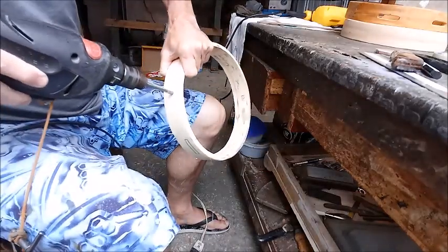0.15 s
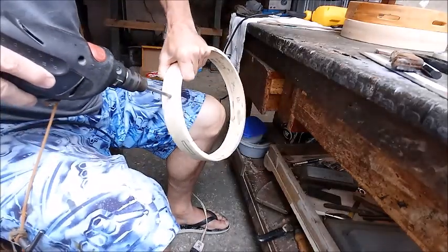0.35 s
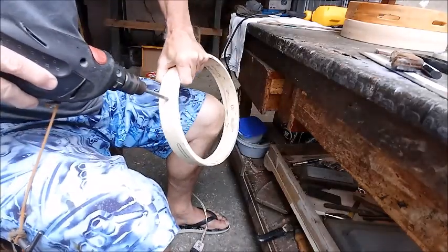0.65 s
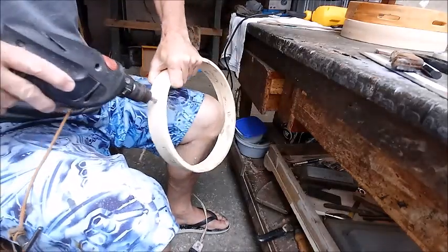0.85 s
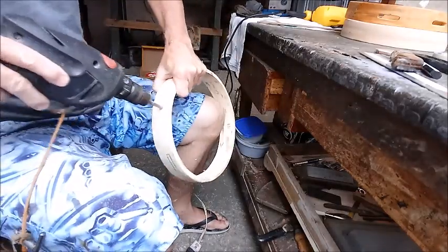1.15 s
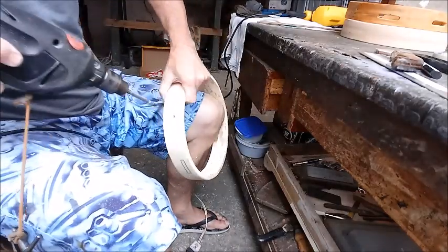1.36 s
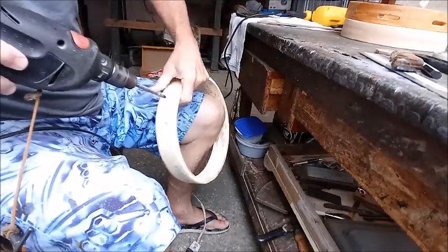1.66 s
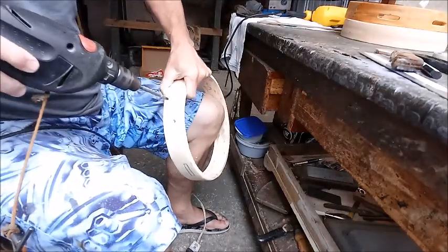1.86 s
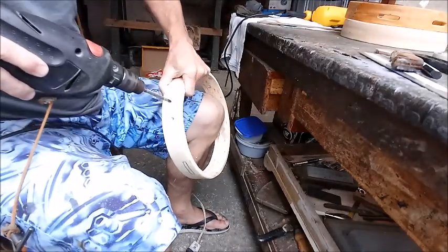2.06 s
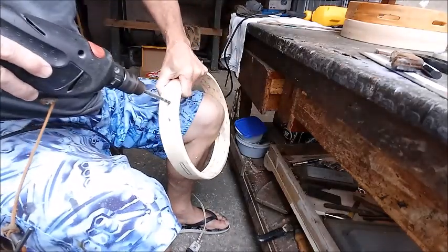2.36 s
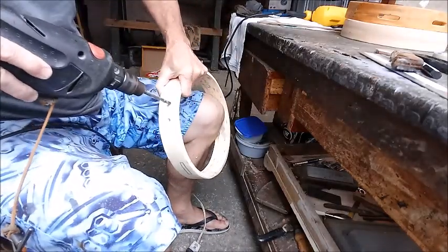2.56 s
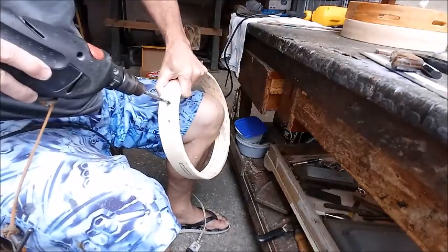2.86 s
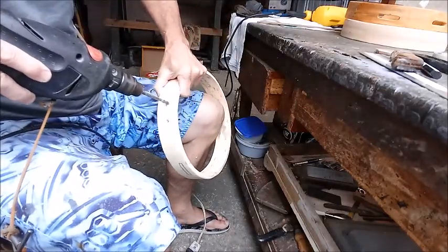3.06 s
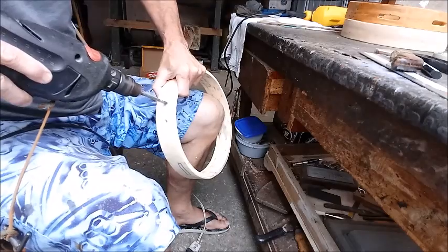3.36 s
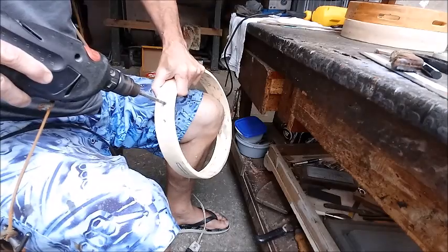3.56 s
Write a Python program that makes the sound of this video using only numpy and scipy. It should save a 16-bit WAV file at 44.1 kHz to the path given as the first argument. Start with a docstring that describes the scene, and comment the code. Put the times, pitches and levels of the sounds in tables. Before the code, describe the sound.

Close up in a small room, an electric drill cuts through a wooden hoop with a whine and an airy hiss. It briefly speeds up once free, winds down to a ticking rattle, and revs back to full speed.

```python
"""A corded drill bores through a thin wooden hoop, close by in a small workshop.
The motor whines over a rush of brushes and fan air, and its pitch sags as the bit bites.
The bit comes free and the rotor picks up, then coasts down with chattering gears until
single knocks ring the casing. Last, the motor spins up again.
Every tone is a multiple of the rotor speed, so all of them glide together."""
import sys
import numpy as np
from scipy import signal
from scipy.fft import rfft, irfft
from scipy.io import wavfile

SR = 44100
rng = np.random.default_rng(int(sys.argv[2]) if len(sys.argv) > 2 else 0)


def to_wav(sig):
    """Store sig (one row per channel, or 1-D mono) as 16-bit WAV at the path in sys.argv[1].

    Samples outside -1..1 are clipped; the rate is SR.
    """
    pcm = np.clip(np.atleast_2d(sig), -1, 1) * 32767
    pcm = np.round(pcm).astype(np.int16)
    wavfile.write(sys.argv[1], SR, pcm.T)  # frames by channels


N = 163170
FULL_SPEED_HZ = 356.3
PORT_NULL_HZ = 2835   # the microphone's two ports cancel at odd multiples of this

# effort of the motor: time_s, whine_db, load_fraction
EFFORT = [(0, -2.5, 0.4), (.3, -0.5, 0.05), (.62, -1, 0.27), (.9, 0.5, 0.63), (1.04, 2, 0.97), (1.17, 6, 1),
          (1.27, 1, 0.97), (1.45, -20.5, 0), (3.15, -12, 0), (3.4, 3, 0), (3.7, -2, 0)]


def from_db(db):
    """Amplitude grows tenfold with every 20 dB."""
    return 10 ** (np.asarray(db) / 20)


def rms_one(x):
    """Normalisation to unit mean power."""
    return x / np.sqrt(np.mean(x ** 2) + 1e-20)


def in_time(rows):
    """Linear interpolation of each column against the first, time."""
    time_s, *columns = np.transpose(rows)
    return [np.interp(np.arange(N) / SR, time_s, column) for column in columns]


def drift(corner_hz):
    """Low-passed noise: a random fluctuation with unit spread."""
    step = 40   # samples between points
    pole = np.exp(-2 * np.pi * corner_hz * step / SR)
    noise = rng.standard_normal(N // step + 2002)
    slow = signal.lfilter([1], [1, -2 * pole, pole * pole], noise)[2000:]
    return np.interp(np.arange(N) / step, np.arange(len(slow)), rms_one(slow))


def coloured(x, spectrum):
    """Spectral shaping, scaled so that white noise keeps its power after the ports."""
    hz = np.arange(N + 1) * SR / (2 * N)
    points_hz, points_db = np.transpose(spectrum)
    gain = from_db(np.interp(np.log(hz + 1), np.log(points_hz), points_db))
    pickup = np.cos(np.pi * hz / (2 * PORT_NULL_HZ))
    gain /= np.sqrt(np.mean((gain * pickup) ** 2))
    return irfft(rfft(x, 2 * N) * gain)[:N]


def tone(turns, multiple, db):
    """Rotational order: a flickering sine, raised up to fivefold against port loss at full speed."""
    pickup = max(abs(np.cos(np.pi * multiple * FULL_SPEED_HZ / (2 * PORT_NULL_HZ))), .2)
    flicker_db = 2 * drift(corner_hz=9.3)
    amplitude = np.sqrt(2) / pickup * from_db(db + flicker_db)
    return amplitude * np.sin(2 * np.pi * (multiple * turns + rng.random()))


def workshop(x):
    """Reverberation: diffuse reflections in the cluttered room decay exponentially."""
    level_db, t60_s, gap_s = -11.5, 0.21, .004
    t = np.arange(SR // 2) / SR
    tail = rng.standard_normal(len(t)) * from_db(-60 * t / t60_s) * (t > gap_s)
    return from_db(level_db) * signal.fftconvolve(x, tail / np.linalg.norm(tail))[:N]


def commutator_whistle(turns):
    """A high rotational order: the commutator's thin whistle."""
    # whistle strength: time_s, level_db
    whistle = [(1.0, -62), (1.35, -47), (1.85, -54), (2.15, -85)]
    return tone(turns, multiple=37.77, db=in_time(whistle)[0])


def shaft_hum(speed, turns, free, shaft_db):
    """Forced vibration: gear shafts and rotor unbalance hum, growing as a power of speed."""
    # gear shaft tones: rotor_multiple, in_wood_db, free_db
    shaft_tones = [(.428, -60, -50), (.685, -50.5, -48), (.856, -39.5, -53)]
    shafts = sum(tone(turns, k, shaft_db + held + free * (idle - held)) for k, held, idle in shaft_tones)
    unbalance = tone(turns, multiple=1, db=-41 + 3 * free)
    return (shafts + unbalance) * (speed / FULL_SPEED_HZ) ** 2.84


def fan_rasp(speed, turns, free):
    """Random modulation spreads the fan tone into a rough band once the bit is free."""
    whine_db, _ = in_time(EFFORT)
    carrier = tone(turns, multiple=6, db=whine_db - 27.5)
    return free * (speed / FULL_SPEED_HZ) ** 2 * drift(corner_hz=190) * carrier


def gear_mesh(speed, turns, mesh_db):
    """Periodic tooth contact makes tones whose amplitude grows with speed squared."""
    # mesh tones: rotor_multiple, level_db
    mesh_tones = [(1.711, -33), (3.422, -29.5), (9.41, -40)]
    return sum(tone(turns, k, db + mesh_db) for k, db in mesh_tones) * (speed / FULL_SPEED_HZ) ** 2


def casing(slowness, turns):
    """Modal resonance: at low speed, ticks and knocks of the slack gears ring the casing."""
    # knocks of the gears: start_s, peak_db
    knock_list = [(2.7223, -11), (2.803, -20.5), (2.816, -20), (2.8353, -16), (2.850, -19), (2.872, -17),
                  (2.883, -15), (2.902, -28), (2.911, -14), (2.922, -12.5), (2.933, -15), (2.945, -14),
                  (2.972, -15), (2.982, -13), (2.9941, -13.5), (3.043, -14.5), (3.049, -11), (3.074, -10.5),
                  (3.093, -14), (3.123, -10.5), (3.153, -8), (3.188, -7.5), (3.218, -11)]
    # casing modes: pitch_hz, width_hz, level_db
    modes = [(857, 140, 6), (1978, 344, 8), (2512, 520, 6.5), (3590, 420, 6.5), (5140, 360, -3),
             (6050, 210, 2.5)]
    knock_decay_s, tick_db, tick_decay_per_turn, band_hz = 0.0018, -20.5, 4.04, (560, 10200)
    hits = np.zeros(N)
    for start_s, peak_db in knock_list:
        hits[int(start_s * SR)] = from_db(peak_db)
    knocks = signal.lfilter([1], [1, -np.exp(-1 / (knock_decay_s * SR))], hits + 1e-18)
    ticks = from_db(tick_db) * slowness * np.exp(-tick_decay_per_turn * (turns % 1))
    drive = np.hypot(knocks, ticks) * rng.choice([-1, 1], N)
    rings = np.zeros(N)
    for k, (hz, width, db) in enumerate(modes):
        resonator = signal.iirpeak(hz, hz / width, fs=SR)
        rings += (-1) ** k * from_db(db) * signal.lfilter(*resonator, drive)
    total_width = sum(width for _, width, _ in modes)
    band = signal.butter(2, band_hz, "band", fs=SR, output="sos")
    return np.sqrt(SR / (np.pi * total_width)) * signal.sosfilt(band, rings)


def gear_chatter(speed):
    """Shot noise: random tooth impacts ring the gearbox, fewer as the rotor slows."""
    # chatter strength: time_s, level_db
    chatter = [(0, -24), (.65, -23), (1.0, -26), (1.2, -24), (1.32, -20), (1.55, -19), (1.8, -20.5),
               (2.15, -22.5), (2.5, -26), (2.8, -29.5), (3.08, -31), (3.15, -23.5), (3.3, -23), (3.45, -21),
               (3.7, -22.5)]
    # gearbox spectrum: frequency_hz, level_db
    gearbox = [(25, -33), (90, -29.5), (200, -18), (320, -10), (520, -3), (750, 0.5), (1000, 2.5),
               (1280, 0.5), (1550, -9.5), (2000, -10.5), (3000, -9), (8000, -57)]
    impacts_per_s, spread_db = 2600 * speed / FULL_SPEED_HZ, 2.5
    hit = rng.random(N) < impacts_per_s / SR
    sizes = from_db(spread_db * rng.standard_normal(N)) * rng.choice([-1, 1], N)
    impacts = rms_one(hit * sizes / np.sqrt(speed))   # even power at any impact rate
    return from_db(in_time(chatter)[0]) * coloured(impacts, gearbox)


def brushes(slowness, turns):
    """Amplitude modulation: brush and air noise swells once a turn and pulses with the mains."""
    # strength of the rush: time_s, level_db
    rush = [(0, -18), (.4, -17.5), (.8, -17), (1.2, -21.5), (1.32, -17), (1.5, -20), (1.8, -21),
            (2.2, -23.5), (2.55, -25.5), (2.85, -30.5), (3.06, -29), (3.2, -22.5), (3.28, -19), (3.48, -18),
            (3.7, -17)]
    # spectrum of brushes and fan air: frequency_hz, level_db
    air = [(100, -45), (800, -16), (1500, -6), (1950, 0.5), (2450, -0.5), (3200, 1.5), (3700, 3),
           (4400, 0.5), (5100, 0), (5900, 0.5), (6400, -2), (7000, -8.5), (8000, -21), (9000, -26.5),
           (10500, -21.5), (12000, -22), (13500, -24.5), (14700, -9.5), (15700, -14.5)]
    turn_spread_db, mains_pulse_hz = 1.5, 101.6
    depth = 0.14 + 0.31 * slowness
    turn_gain = from_db(turn_spread_db * rng.standard_normal(N)[turns.astype(int)])
    swell = np.exp(depth * np.cos(2 * np.pi * turns)) / np.sqrt(np.i0(2 * depth))   # unit mean power
    mains = 1 + 0.09 * np.sin(2 * np.pi * mains_pulse_hz * np.arange(N) / SR)
    noise = rms_one(swell * turn_gain * mains * rng.standard_normal(N))
    return from_db(in_time(rush)[0]) * coloured(noise, air)


def motor_whine(speed, turns, free):
    """Harmonic series: fan and armature tones, whose balance shifts with the load on the bit."""
    # harmonics: rotor_multiple, light_touch_db, loaded_db, free_db
    harmonics = [(5, -29, -46.5, -45), (6, -23, -22, -30), (7, -35, -41.5, -41), (11, -42, -33, -38),
                 (12, -25, -20.5, -29), (13, -30, -29, -40), (16, -31, -37, -48), (17, -25.5, -29, -35),
                 (18, -22.5, -32, -27.5)]
    whine_db, load = in_time(EFFORT)
    whine = np.zeros(N)
    for multiple, light_db, loaded_db, free_db in harmonics:
        in_wood_db = light_db + load * (loaded_db - light_db)
        whine += tone(turns, multiple, whine_db + (1 - free) * in_wood_db + free * free_db)
    return whine * (speed / FULL_SPEED_HZ) ** 2


def drive_train(speed, turns, free):
    """Phase modulation: the rotor's unsteadiness shakes motor and gear tones together."""
    # firmness of the gears: time_s, mesh_db, shaft_db
    firmness = [(0, -3.5, 0.5), (.33, -2.5, 2), (.52, 4, -21), (.85, -2.5, -17), (1.05, -13.5, -12.5),
                (3.2, -17.5, -6.5), (3.55, -11, -1.5)]
    mesh_db, shaft_db = in_time(firmness)
    wander_rad = 0.027 * drift(corner_hz=26)
    shudder_rad = 0.12 * free * drift(corner_hz=54)   # nothing steadies the free spindle
    shaky = turns + (wander_rad + shudder_rad) / (2 * np.pi)
    return (motor_whine(speed, shaky, free) + gear_mesh(speed, shaky, mesh_db)
            + shaft_hum(speed, shaky, free, shaft_db) + commutator_whistle(shaky))


def scene():
    """Superposition: one rotor drives every layer, heard in the centre."""
    # rotor speed: time_s, rotation_hz
    rotor_speed = [(0, 354.4), (.32, 356.8), (.6, 353.5), (.88, 339.5), (.95, 332.3), (1.02, 329),
                   (1.13, 321.8), (1.22, 323), (1.34, 356.4), (1.47, 373.4), (1.72, 323.6), (2.0, 267.9),
                   (2.4, 200.7), (2.65, 162.8), (2.82, 109.3), (2.97, 87.8), (3.08, 167.6), (3.27, 279.6),
                   (3.4, 326.6), (3.55, 356.2), (3.7, 375)]
    speed, = in_time(rotor_speed)
    turns = np.cumsum(speed) / SR
    slowness = np.clip(1 - speed / FULL_SPEED_HZ, 0, 1)
    withdraw_s, clear_s = 1.187, 1.33   # the bit leaves the wood
    free, = in_time([(withdraw_s, 0), (clear_s, 1)])
    clatter = gear_chatter(speed) + brushes(slowness, turns) + casing(slowness, turns)
    tones = drive_train(speed, turns, free) + fan_rasp(speed, turns, free)
    return np.tile(tones + clatter + workshop(clatter), (2, 1))


def record(dry):
    """Comb filtering: the microphone sums two ports, one delayed; a steep low-pass cuts the top."""
    cutoff_hz = 15850
    hz = np.arange(N + 1) * SR / (2 * N)
    comb = (1 + np.exp(-1j * np.pi * hz / PORT_NULL_HZ)) / 2
    heard = irfft(rfft(dry, 2 * N) * comb)[:, :N]
    return signal.sosfilt(signal.ellip(12, .1, 90, cutoff_hz, fs=SR, output="sos"), heard)


dry = scene()
out = record(dry)
to_wav(out)
```